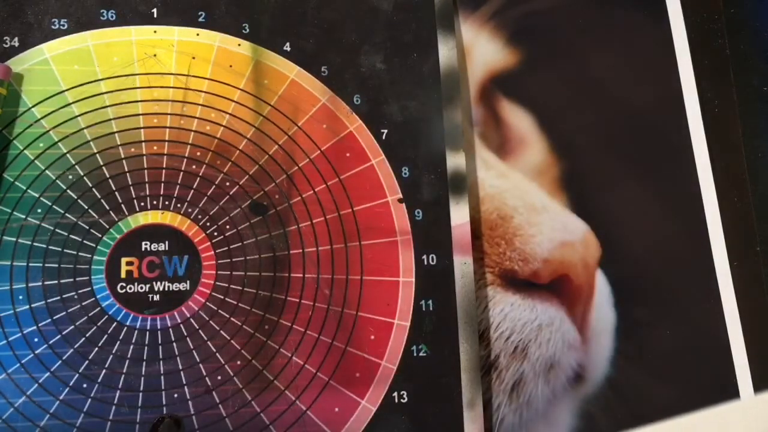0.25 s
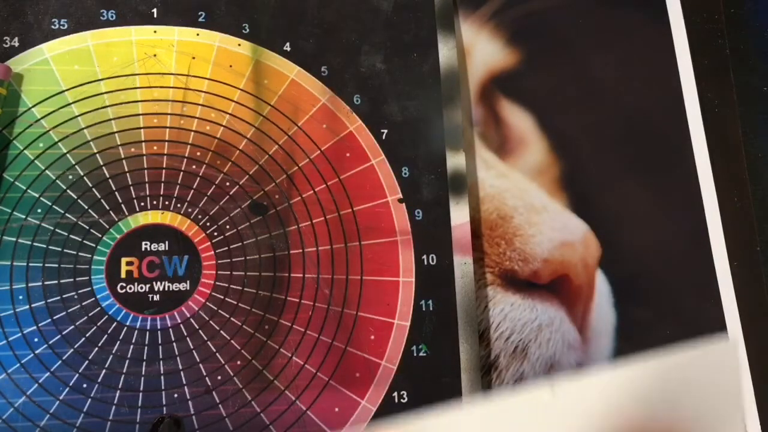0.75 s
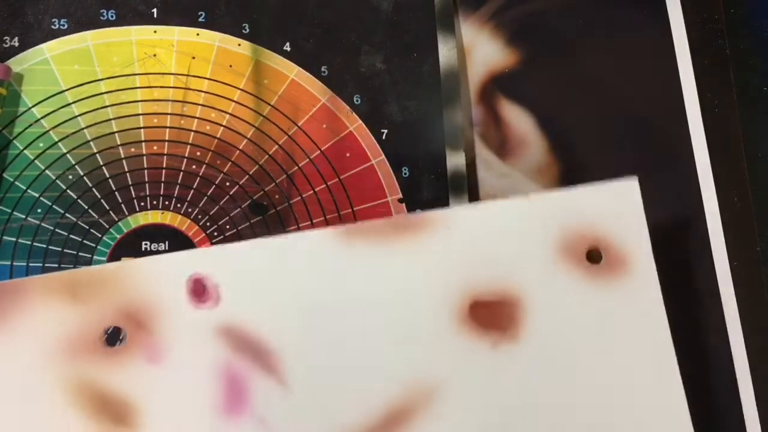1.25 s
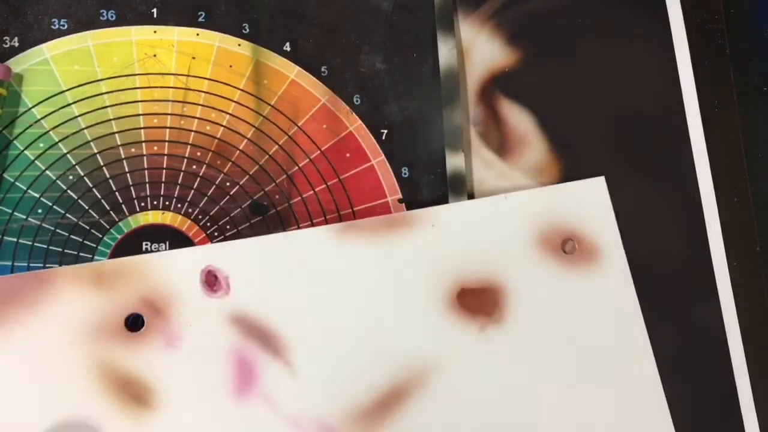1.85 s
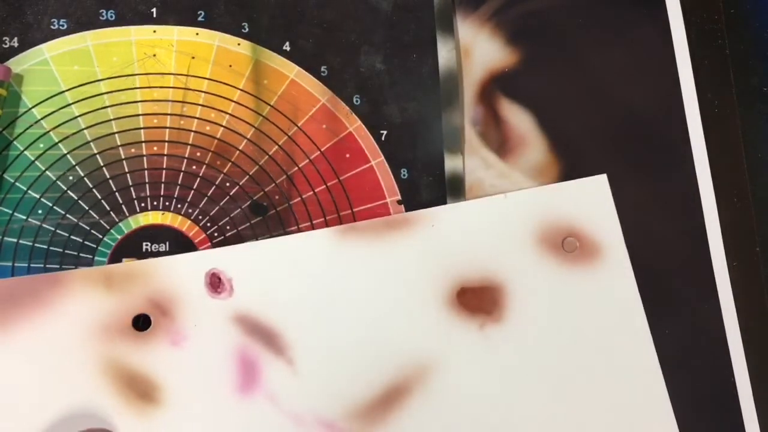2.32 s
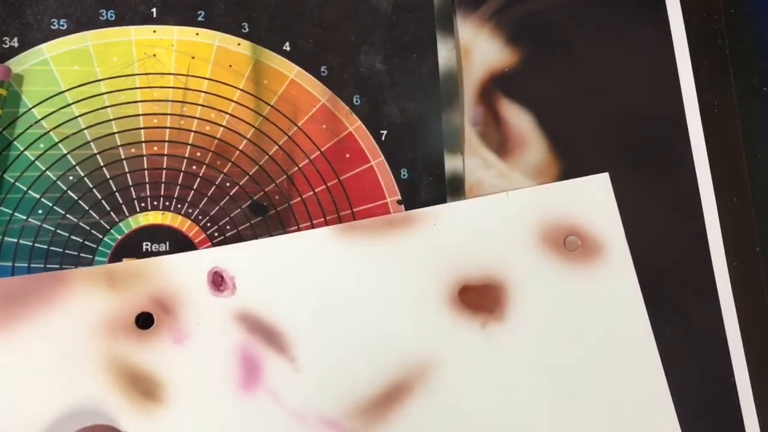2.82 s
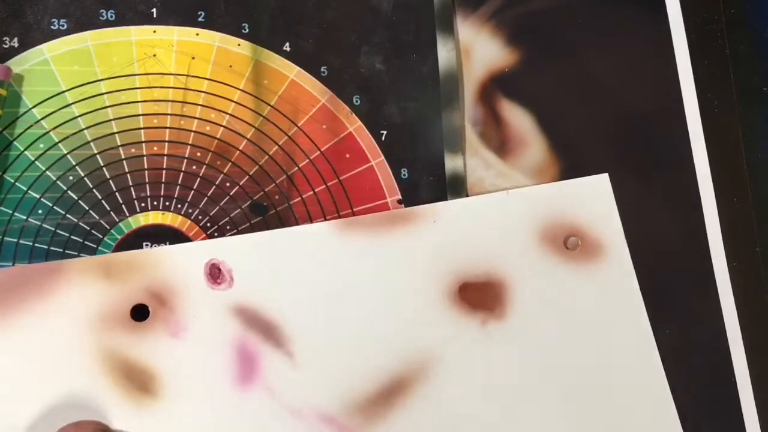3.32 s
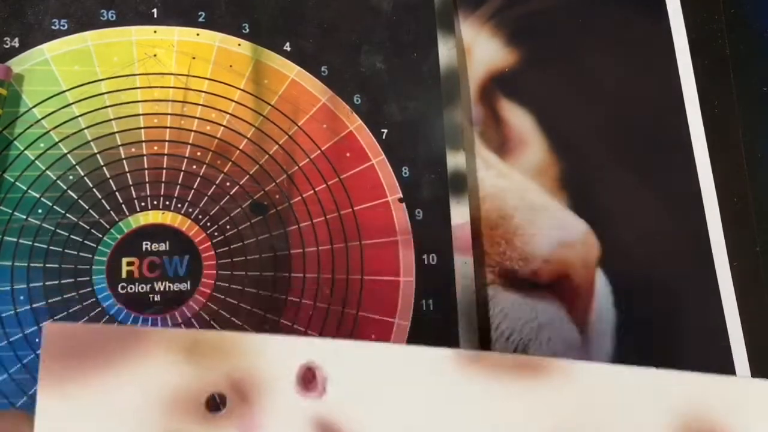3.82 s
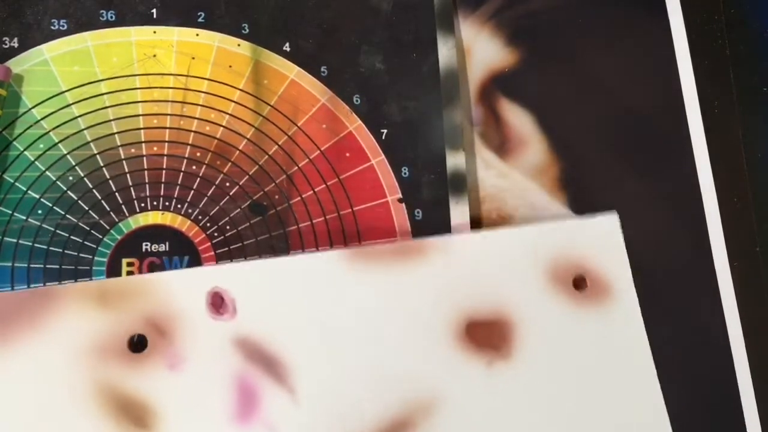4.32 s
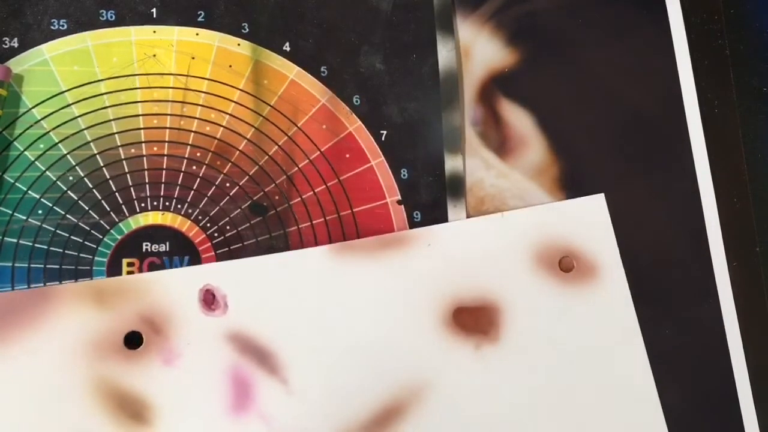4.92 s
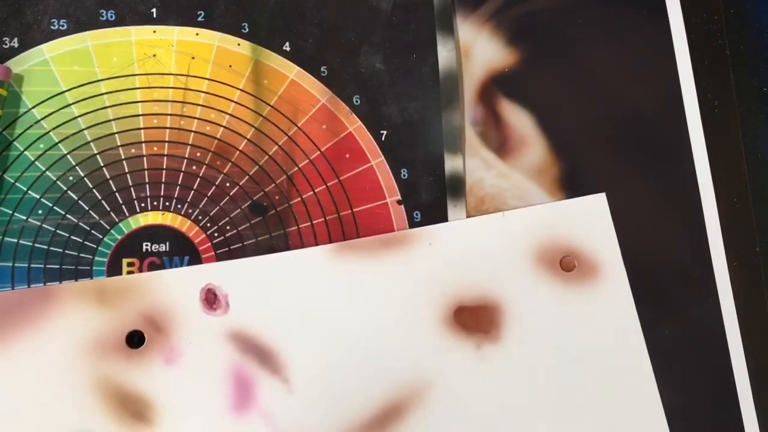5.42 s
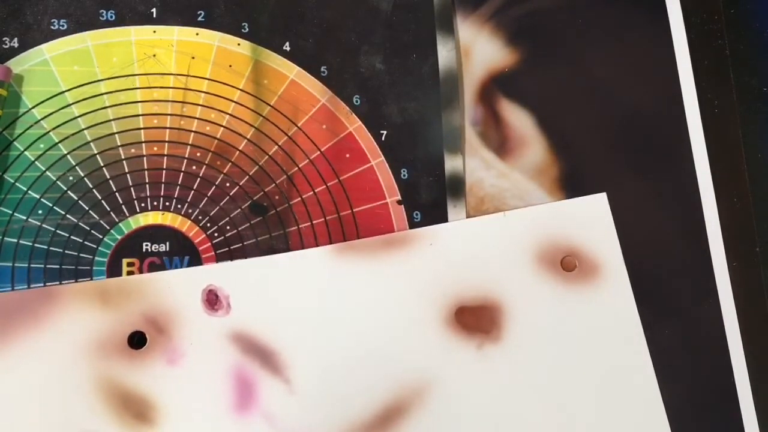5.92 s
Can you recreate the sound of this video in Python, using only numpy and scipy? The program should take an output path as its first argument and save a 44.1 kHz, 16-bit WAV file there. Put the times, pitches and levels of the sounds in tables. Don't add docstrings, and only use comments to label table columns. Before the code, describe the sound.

An airbrush roars against a surface, thins to a bright hiss and shuts off, then a stiff card ticks, rustles and knocks in a quiet room.

```python
import sys
import numpy as np
from scipy import signal
from scipy.fft import rfft, irfft, next_fast_len
from scipy.io import wavfile
from scipy.ndimage import uniform_filter1d, map_coordinates

SR = 44100
rng = np.random.default_rng(int(sys.argv[2]) if len(sys.argv) > 2 else 0)


def gain_from_db(level_db):
    decades = np.asarray(level_db, float) / 20
    return 10 ** decades


def store_wav(level_fs):
    pcm = np.round(np.clip(np.atleast_2d(level_fs), -1, 1) * 32767)
    wavfile.write(sys.argv[1], SR, pcm.T.astype(np.int16))


N = 271523
T = np.arange(N) / SR

# t/s, level/dB
RUMBLE_LEVEL = [
    (0, -48.5),
    (.6, -49),
    (.85, -48),
    (2.2, -46.5),
    (2.52, -42.5),
    (3.3, -44.5),
    (3.8, -42.5),
    (5.1, -44),
    (5.9, -49.5),
    (6.16, -51.5),
]
# f/Hz, density/dB
RUMBLE_COLOUR = [(19, -28.5), (32, 3), (56, 0.5), (124, -20), (194, -14.5), (248, -23), (285, -34),
                 (311, -26), (340, -24), (440, -54), (750, -120)]
# f/Hz, level/dB
FAN_TONES = [(41, -3.5), (59, -3.5)]
# f/Hz, width/Hz, level/dB
DRONES = [(49.62, 14, -10.5), (80.6, 33, -11), (99.3, 38, -1.5), (155, 20, -6), (191.2, 26, -5),
          (240.5, 27, -12.5)]
# f/Hz, density/dB
MURMUR_COLOUR = [(160, -22), (280, -0.5), (313, -14.5), (369, -9), (455, -19), (562, -9.5), (621, -19),
                 (1000, -19), (2500, -34.5), (3250, -68.5), (5500, -120)]
# t/s, half length/s, lift/dB
WAFTS = [
    (.7, .08, 16.5),
    (1.3, .3, 3),
    (2.277, 0.19, 5),
    (2.93, 0.11, 6.5),
    (3.79, 0.32, 1.5),
    (4.9, 0.095, 1),
]
# f/Hz, density/dB
HISS_COLOUR = [(880, -36), (1500, -7), (3190, -5), (4860, -7.5), (5910, -5), (7620, -7.5), (15600, -3)]
# t/s, peak/dB, rise/(dB/s), fall/(dB/s)
BENDS = [
    (1.8, -74, 153, 28.5),
    (3.68, -69, 32, 46),
]
# start t/s, length/s, peak/dB, peak place/0-1, brightness/dB
SLIDES = [(1.14, 0.044, -62, 0.6, -5), (1.642, 0.072, -55.5, 0.55, -8), (1.713, .09, -65, .12, 2),
          (1.815, .05, -75, .55, 5), (1.925, .07, -66.5, .55, -0.5), (2.167, 0.079, -68, .65, -6),
          (2.584, .06, -68.5, .7, -5), (3.17, .07, -70.5, .8, -0.5), (3.387, 0.15, -60, .15, 1),
          (3.603, 0.019, -53.5, .6, -3.5), (3.626, 0.0091, -39.5, .08, -8.5), (3.689, .012, -46, .35, -5),
          (3.702, 0.0075, -46.5, .3, 1.5), (3.71, 0.019, -43, .1, -3), (3.771, 0.047, -40, .17, -13),
          (3.894, 0.016, -63, .6, -1), (4.311, .021, -56.5, .3, -1), (4.331, .065, -47.5, .52, -1.4),
          (4.456, 0.066, -50.5, .68, 1.2), (4.706, .09, -73.5, .7, 5), (5.577, 0.077, -73.5, .7, -2.5)]
# f/Hz, width/Hz, level/dB
CARD_MODES = [(1070, 210, -3), (1330, 440, 5), (2020, 430, -4), (2340, 390, 0.5), (4340, 490, -20),
              (6500, 300, -1.5), (13690, 1700, -5.5)]
# t/s, peak/dB, ring f/Hz, low share/dB
TICKS = [(.846, -32.5, 3600, -3), (1.7594, -54, 5830, -4), (1.9029, -52, 3270, -3),
         (2.6559, -53.5, 2930, -14), (2.7576, -61, 3190, 12), (2.9232, -51.5, 4150, -15.5),
         (3.2206, -52.5, 3880, 2), (3.3937, -43.5, 3750, -13), (3.4028, -61, 3810, 6),
         (3.5558, -54.5, 3280, 2), (3.5904, -63, 3850, 16), (3.6247, -36.5, 2620, 4),
         (3.6539, -51, 2810, 1), (3.6688, -49.5, 3800, 6), (3.692, -54, 2830, -3), (3.7045, -41, 6700, -6),
         (3.7138, -26.5, 2930, -26.5), (3.7547, -43, 2780, -1), (3.7735, -43, 3270, -14),
         (3.7795, -32.5, 6100, -3.5), (3.8016, -52, 2910, 13), (3.8357, -49.5, 3130, -12),
         (3.9, -53.5, 4010, -9), (4.0775, -52, 6760, -2.5), (4.132, -51, 4100, -13),
         (4.1965, -54, 6970, -9), (4.2084, -55, 4540, 3), (4.4525, -50.5, 6960, -9.5),
         (4.5516, -46.5, 6190, -13.5)]
# t/s, peak/dB
MORE_TICKS = [(1.7913, -63.5), (2.0257, -61.5), (2.1909, -60.5), (2.6246, -61), (2.8437, -59.5), (3.034, -61),
              (3.14, -52.5), (3.27, -55), (3.4128, -43), (3.4947, -56.5), (3.8588, -55), (3.9198, -54.5),
              (3.9906, -61), (4.5264, -59.5), (4.6583, -55), (4.716, -56), (4.809, -56), (4.9662, -57.5),
              (5.0389, -62), (5.5664, -63.5), (5.9305, -59), (5.953, -58), (6.0141, -57), (6.1454, -55)]
# f/Hz, level/dB, t60/s
BOARD_KNOCK_MODES = [(260, -8.5, 0.14), (412, -13, 0.066), (910, -9, 0.043), (973, 1, 0.023),
                     (1180, -14, 0.032), (1410, -14, 0.018), (1617, -11.5, 0.054), (2080, -10.5, 0.023),
                     (2420, -12, 0.023), (3083, -26, 0.0093), (3980, -14, 0.0093)]
# t/s, blow/dB
KNOCKS = [(0.849, -46), (1.54, -48.5), (3.86, -52), (3.623, -39.5), (3.7135, -39.5), (3.7738, -38),
          (3.779, -27.5), (3.784, -29), (3.801, -34.5), (3.81, -40.5), (3.903, -48)]
# f/Hz, width/Hz, level/dB
EASEL_MODES = [(241.7, 47, -2), (487, 103, -2), (632, 150, -3.5), (890, 68, -2), (1198, 43, -9.5),
               (1670, 150, -13.5), (2400, 200, -18), (2960, 400, -19.5), (4120, 500, -22)]
# t/s, level/dB
STRIKE_LEVEL = [
    (0, -31),
    (.09, -31),
    (.26, -33.5),
    (.45, -31.5),
    (.605, -34.5),
    (.65, -40),
    (.715, -47),
    (.745, -63),
    (.79, -86),
]
# f/Hz, density/dB
STRIKE_COLOUR = [(120, -42.5), (240, -22), (380, -16.5), (620, -1.5), (2000, -1.5), (3400, -4.5),
                 (4000, -10), (6000, -1.5), (8000, -16), (12000, -30)]
# f/Hz, width/Hz, level/dB
STRIKE_PEAKS = [(1040, 150, 4), (2080, 320, 6), (2790, 150, 3), (3660, 160, 7), (4618, 300, 5.5),
                (5613, 100, 0), (6360, 400, 2.5), (7050, 240, 1)]
GAP_NOTCH_DB = [-13, -7, -3.5, -3.5]
# t/s, level/dB
JET_LEVEL = [
    (0, -26.5),
    (.48, -26),
    (.72, -30.5),
    (.84, -28),
    (.98, -31.5),
    (1.36, -37.5),
    (1.715, -40),
    (1.748, -62.5),
    (1.8, -76.5),
]
# t/s, delay/ms, share/1
JET_ECHO = [(0, .25, .1), (.6, .25, .12), (.68, .36, .25), (.78, .52, .25), (.88, .6, .1), (1.8, .62, .06)]
# f/Hz, density/dB
JET_COLOUR = [(290, -61), (500, -28), (667, -29), (1600, -23.5), (4860, -14.5), (9020, -8.5), (10400, -6),
              (14100, 2), (15600, 1)]
# f/Hz, width/Hz, level/dB
HOUSING_DIPS = [(4910, 810, -4), (7854, 640, -3), (10500, 800, -4)]


def evened(x):
    return x / np.sqrt(np.mean(x ** 2) + 1e-20)


def peaked(x):
    return x / np.max(np.abs(x))


def over_time(points, lead_s=0):
    s, db = np.transpose(points)
    return np.interp(T + lead_s, s, db, right=-150)


def read(points, hz):
    f, value = np.transpose(points)
    return np.interp(np.log(hz + 1), np.log(f + 1), value)


def bumps(rows, hz):
    return sum(db / (1 + (2 * (hz - f) / width) ** 2) for f, width, db in rows)


def noise(colour, size, patchy_db, flicker_db):
    hop = size // 4
    frames, hz = N // hop + 5, np.fft.rfftfreq(size, 1 / SR)
    a, b, patches = rng.standard_normal((frames, len(hz), 3)).T
    patches = uniform_filter1d(patches, size=size // 80 + 1, axis=0)
    patches = evened(uniform_filter1d(patches, size=3000 // hop + 1, axis=1))
    flicker = evened(uniform_filter1d(rng.standard_normal(frames), size=600 // hop + 1))
    level_db = colour(hz)[:, None] + patchy_db * patches + flicker_db * flicker
    spectra = (a + 1j * b) * gain_from_db(level_db)
    return signal.istft(spectra, nperseg=size, noverlap=size - hop)[1][:N]


def band(x, lo_hz, hi_hz):
    sos = signal.butter(N=2, Wn=[lo_hz, hi_hz], btype="band", fs=SR, output="sos")
    return signal.sosfiltfilt(sos, x)


def lowpass(x, hz, order):
    return signal.sosfiltfilt(signal.butter(N=order, Wn=hz, fs=SR, output="sos"), x)


def brightened(x, split_hz, ref, other, rel_db):
    low = lowpass(x, split_hz, 2)
    near, far = (low, x - low) if ref[0] < split_hz else (x - low, low)
    return near / np.std(band(x, *ref)) + far / np.std(band(x, *other)) * gain_from_db(rel_db)


def three_bands(x, low_hz, high_hz, mid_db, top_db):
    low, under = lowpass(x, low_hz, 3), lowpass(x, high_hz, 3)
    return evened(low) + gain_from_db(mid_db) * evened(under - low) + gain_from_db(top_db) * evened(x - under)


def resonate(x, hz, width):
    return signal.lfilter(*signal.iirpeak(hz, hz / width, SR), x)


def resonate_twice(x, hz, width):
    return resonate(resonate(x, hz, width), hz, width)


def hum():
    def wander(knots):
        smooth = uniform_filter1d(uniform_filter1d(knots, size=14), size=14)
        return np.interp(T, np.arange(len(knots)) / 100, evened(smooth))

    out = np.zeros(N)
    knots = rng.standard_normal((len(FAN_TONES), 2, N // 441 + 2))
    for (hz, db), (strength, pitch) in zip(FAN_TONES, knots):
        phase = 2 * np.pi * np.cumsum(hz * (1 + .035 * wander(pitch))) / SR
        out += gain_from_db(db + 2.1 * wander(strength)) * np.sin(phase)
    return out


def ventilation():
    wide = evened(noise(lambda hz: read(RUMBLE_COLOUR, hz), size=4096, patchy_db=-2.5, flicker_db=1.0))
    drive = rng.standard_normal((len(DRONES), N))
    drones = sum(gain_from_db(db) * evened(resonate_twice(d, hz, w)) for d, (hz, w, db) in zip(drive, DRONES))
    rumble = evened(gain_from_db(-7.5) * wide + evened(drones) + gain_from_db(4.0) * hum())
    rumble = band(band(rumble, 27, 2000), 27, 2000)
    return gain_from_db(over_time(RUMBLE_LEVEL)) * rumble


def air_murmur():
    air_db, follow, bright_db = -67, 0.55, -9
    air = noise(lambda hz: read(MURMUR_COLOUR, hz), size=1024, patchy_db=.8, flicker_db=.6)
    waft_db = sum(db * np.exp(-((T - s) / half) ** 2) for s, half, db in WAFTS)
    level_db = air_db + follow * (over_time(RUMBLE_LEVEL) + 44) + waft_db
    return gain_from_db(level_db) * brightened(air, 470, (300, 650), (700, 1700), bright_db + .3 * waft_db)


def microphone_hiss():
    hiss = noise(lambda hz: read(HISS_COLOUR, hz), size=512, patchy_db=-0.2, flicker_db=0.5)
    return gain_from_db(-69.5) * evened(hiss)


def rustle():
    rest_db, pops_per_s = -89, 160
    level = gain_from_db(rest_db)
    for s, db, rise, fall in BENDS:
        level = level + gain_from_db(db - np.where(T < s, rise * (s - T), fall * (T - s)))
    pops = (rng.random(N) < pops_per_s / SR) * rng.choice([-1., 1.], size=N)
    pops = pops * gain_from_db(3.0 * np.minimum(rng.exponential(size=N), 3))
    low, high = resonate_twice(pops, 1500, 760), resonate_twice(pops, 3300, 2400)
    return level * evened(low + .5 * high)


def slides():
    start_db, end_db, mid_db, top_db = -14, -24.5, -3, -9.5
    level, bright_db = np.zeros(N), np.zeros(N)
    for start, length, db, place, stroke_db in SLIDES:
        u = (T - start) / length
        on = (u > 0) & (u < 1)
        swell_db = start_db * (1 - u / place) ** 2.0
        fade_db = end_db * np.abs((u - place) / (1 - place)) ** 1.3
        level = np.where(on, gain_from_db(db + np.where(u < place, swell_db, fade_db)), level)
        bright_db = np.where(on, stroke_db, bright_db)
    slips = rng.standard_normal(N)
    slips = slips * gain_from_db(1.5 * evened(uniform_filter1d(rng.standard_normal(N), size=90)))
    card = gain_from_db(-8.5) * band(slips, 550, 20000)
    for k, (hz, width, db) in enumerate(CARD_MODES):
        card = card + (-1) ** k * gain_from_db(db) * resonate(slips, hz, width)
    stroke = three_bands(card, 2500, 9500, mid_db + bright_db, top_db + 0.62 * bright_db)
    return uniform_filter1d(level, size=80) * stroke


def ticks():
    common_hz, common_low_db, tick_top_db = 3300, -3, -12
    lead = 90
    out, t = np.zeros(N + 2000), np.arange(1500) / SR
    rows = TICKS + [(s, db, common_hz, common_low_db) for s, db in MORE_TICKS]
    grit = .25 * rng.standard_normal((len(rows), len(t)))
    grit = grit * gain_from_db(-60 * np.abs(t - .002) / .012) * (t > .002)
    grit[:, lead] = 1
    for (s, db, hz, low_db), snap in zip(rows, grit):
        ring = resonate(snap, 2100, 1800) + resonate(snap, 5150, 1500) + 3.2 * resonate(snap, hz, 600)
        dull = peaked(resonate(snap, 1400, 900)) * gain_from_db(low_db)
        top = peaked(band(snap, 8500, 17000)) * gain_from_db(tick_top_db + 8.5 * np.log2(hz / 3500))
        out[round(s * SR) - lead:][:len(t)] += gain_from_db(db - 1.5) * (peaked(ring) + dull + top)
    return out[:N]


def knocks():
    out, t = np.zeros(N + 6000), np.arange(5000) / SR
    contact = np.minimum(t / .0012, 1)
    spread = rng.uniform(-1, 1, (len(KNOCKS), len(BOARD_KNOCK_MODES), 2))
    for (s, blow_db), draws in zip(KNOCKS, spread):
        ring = np.zeros(len(t))
        for (hz, db, t60), (u, v) in zip(BOARD_KNOCK_MODES, draws):
            decay = gain_from_db(db + 2.4 * u - 60 * t / t60)
            ring += decay * np.sin(2 * np.pi * hz * (1 + 0.012 * v) * t)
        out[round(s * SR):][:len(t)] += gain_from_db(blow_db) * ring * contact
    return out[:N]


def easel_brush():
    start_s, level_db, rise_s, fade_s = 0.8294, -39, 0.026, 0.076
    bright_db, dulling_db_per_s = 8.5, -260
    t = np.clip(T - start_s, 0, .3)
    fade_db = -13 * (np.maximum(t - rise_s, 0) / fade_s) ** 2.0
    level = np.minimum(t / rise_s, 1) ** 1.1 * gain_from_db(level_db + fade_db)
    bright_db = np.maximum(bright_db + dulling_db_per_s * np.maximum(t - .015, 0), -20)
    scuff = rng.standard_normal(N)
    ring = np.zeros(N)
    for k, (hz, width, db) in enumerate(EASEL_MODES):
        ring += (-1) ** k * gain_from_db(db) * evened(resonate(scuff, hz, width))
    return level * brightened(ring, 930, (200, 800), (800, 2000), bright_db)


def strike():
    notch_hz, sharpen_db_per_s = 1227, 3.5
    mid_db, top_db, away_mid_db, away_top_db = 8, -1.15, -12.5, -3.5
    top_lead_s = 0.074
    level_db = over_time(STRIKE_LEVEL)
    away = np.clip((-32.5 - level_db) / 7, 0, 1)
    mid_db = mid_db + sharpen_db_per_s * (T - .3) + away_mid_db * away
    top_db = top_db + away_top_db * away + over_time(STRIKE_LEVEL, top_lead_s) - level_db
    notches = [(k * notch_hz, 110 * k ** .7, db) for k, db in enumerate(GAP_NOTCH_DB, start=1)]
    shape = STRIKE_PEAKS + notches
    roar = noise(lambda hz: read(STRIKE_COLOUR, hz) + bumps(shape, hz), size=2048, patchy_db=.4, flicker_db=0.3)
    gusts_db = evened(uniform_filter1d(rng.standard_normal(N), size=150))
    return gain_from_db(level_db) * three_bands(roar * gain_from_db(gusts_db), 1230, 4800, mid_db, top_db)


def jet():
    body_db, body_gain = -11, 0.14
    shade_s, shade_half_s, shade_db = 0.86, .13, -6.5
    at, delay_ms, share = np.transpose(JET_ECHO)
    air = noise(lambda hz: read(JET_COLOUR, hz), size=512, patchy_db=1.5, flicker_db=0.17)
    echo = map_coordinates(air, [(T - np.interp(T, at, delay_ms) / 1000) * SR], order=3)
    air = air + np.interp(T, at, share) * echo
    screen_db = shade_db * np.exp(-((T - shade_s) / shade_half_s) ** 2)
    air = air + (gain_from_db(screen_db) - 1) * band(air, 300, 5200)
    level_db = over_time(JET_LEVEL)
    body_db = body_db - body_gain * np.maximum(level_db + 30, -14)
    return gain_from_db(level_db) * brightened(air, 13000, (11000, 15600), (5500, 10000), body_db)


def walls(x):
    t60_s = .2
    at = np.arange(200, 9000, 20) + rng.integers(0, 20, size=440)
    tail = np.zeros(9100)
    tail[at] = rng.choice([-1., 1.], size=440) * gain_from_db(-60 * at / SR / t60_s)
    return signal.oaconvolve(x, tail / np.linalg.norm(tail))[:N]


def scene():
    room = ventilation() + air_murmur() + microphone_hiss()
    card = rustle() + slides() + ticks() + knocks() + easel_brush()
    near = card + strike() + jet()
    mix = near + gain_from_db(-18) * walls(near) + room
    return np.array([mix, mix])


def low_pass(x):
    return signal.sosfilt(signal.butter(12, 15730, fs=SR, output="sos"), x)


def record(dry):
    size = next_fast_len(N + 4096)
    dips = gain_from_db(bumps(HOUSING_DIPS, np.fft.rfftfreq(size, 1 / SR)))
    mix = irfft(rfft(dry, size) * dips, size)[:, :N]
    return low_pass(mix)


dry = scene()
out = record(dry)
store_wav(out)
```